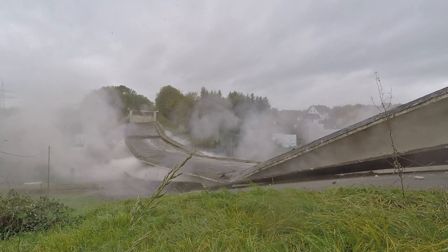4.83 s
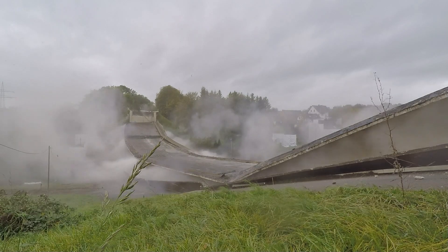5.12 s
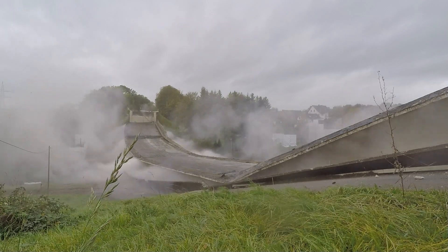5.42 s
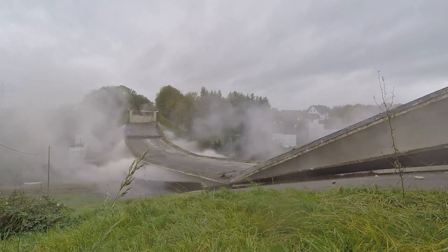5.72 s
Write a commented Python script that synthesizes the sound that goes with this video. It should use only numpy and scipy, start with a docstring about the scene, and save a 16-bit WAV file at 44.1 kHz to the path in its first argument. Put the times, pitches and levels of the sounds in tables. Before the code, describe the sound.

At the start, the tail of an explosion rolls away across an open valley, fading over a low rumble and a light trickle of debris. From about 1 second a concrete bridge crashes down in a run of deep booms, with a loud crack at 1.2 seconds. More heavy landings and hollow block thuds come between 2 and 2.6 seconds. Rubble, gravel and hissing grit pour down, strongest around 2.6 seconds, with clacking stones and a faintly ringing railing. From 2.5 to 4.2 seconds brittle concrete snaps sharply close by, loudest near 4 seconds. Small steel pings are scattered through, and dragged steel squeals briefly around 3.8 to 4 seconds. The rumble swells again, with softer thumps and cracks from 4.4 to 5.5 seconds. The debris thins, but the rumble is still going at the end, near 5.8 seconds. The slopes return faint, dull echoes.

```python
"""A concrete viaduct, its piers blown, collapses span by span across an open valley.
Each landing pushes out a pressure pulse and sets ground and deck rumbling. Concrete bursts and
crushes, brittle pieces snap close by, blocks thud; rubble, gravel, grit and sand pour after them.
Struck steel pings, dragged steel squeals, the railing rings faintly under the gravel.
The blast rolls away between the slopes, which also return a few dull echoes of the impacts."""
import sys
import numpy as np
from scipy import signal
from scipy.fft import rfft, irfft
from scipy.io import wavfile
from scipy.ndimage import uniform_filter1d

SR = 44100
rng = np.random.default_rng(int(sys.argv[2]) if len(sys.argv) > 2 else 0)


def put_to_file(sound):
    """Save the sound as 16-bit audio at rate SR, in the file named by the first command-line argument."""
    columns = np.atleast_2d(sound).T  # one column per channel
    safe = np.clip(columns, -1, 1)
    whole_steps = np.round(safe * 32767)
    wavfile.write(sys.argv[1], SR, whole_steps.astype(np.int16))


N = 254016
TIME = np.arange(N) / SR

# heavy sections landing: start_s, settle_s, level_db, pitch_hz
LANDINGS = [(0.83, 0.029, -12, 100), (1.012, 0.015, -1, 49.7), (1.054, 0.046, -5.5, 58),
            (1.181, 0.044, -5.5, 79.6), (1.268, .01, -5, 70.5), (1.62, 0.01, -2, 79),
            (1.841, 0.042, -8, 39.4), (1.998, 0.039, -5.5, 44), (2.089, 0.023, -0.5, 61),
            (2.335, 0.0076, -6.5, 55), (2.558, 0.0066, -10, 122), (2.998, 0.0087, -11.5, 42),
            (3.103, 0.016, -12.5, 79), (4.457, 0.01, -11, 66), (4.553, .02, -15, 42),
            (4.662, 0.04, -16, 58), (4.923, .025, -12.5, 34), (4.97, .015, -14, 72),
            (5.011, 0.038, -10, 71), (5.295, .02, -17.5, 80.4), (5.389, 0.016, -13, 92),
            (5.491, 0.028, -15, 96)]
# shaking between landings: time_s, ground_db, deck_db
RUMBLE_LEVELS = [(0, -18.5, -19), (0.55, -24.5, -27), (0.9, -22.5, -25), (1.1, -17, -24.5),
                 (1.45, -16.5, -25), (1.76, -21.5, -29), (1.9, -18.5, -30), (2.1, -15, -19.5),
                 (2.26, -21.5, -23), (2.52, -15, -23.5), (2.8, -24.5, -24.5), (3.1, -23, -28),
                 (3.4, -26.5, -24.5), (3.7, -30.5, -32.5), (3.85, -28, -32), (3.98, -26, -35.5),
                 (4.2, -19.5, -25), (4.55, -16.5, -26), (4.8, -22.5, -29), (5.13, -22.5, -23.5),
                 (5.225, -24, -28.5), (5.33, -28, -25.5), (5.48, -24.5, -21.5), (5.62, -34, -25.5),
                 (5.76, -23, -26.5)]
# concrete fractures: start_s, crush_s, crack_db, body_over_crack_db, edge_over_crack_db
FRACTURES = [(1.172, 0.00076, -26.5, 10, -5), (1.216, 0.0055, -22, -5, -1), (1.2192, 0.01, -17.5, -2, -4),
             (1.231, 0.012, -21.5, 8, -5), (1.249, 0.01, -21.5, 6.5, -2), (1.352, 0.028, -35.5, 8, -3.5),
             (1.526, 0.041, -31, 4.5, -19), (1.603, 0.046, -34.5, 4.5, -16), (2.009, 0.036, -38.5, 21, -2),
             (2.047, 0.022, -37.5, 22, -5), (2.084, 0.047, -31, 16.5, -9), (2.15, 0.027, -36.5, 18, -3.5),
             (2.317, 0.026, -26.5, 0, -2), (2.357, 0.0074, -35, 20, -18), (2.539, 0.01, -29.5, 14.5, -9),
             (2.563, 0.0091, -22, -10, -6), (2.62, 0.033, -26, -8, -9), (2.689, 0.031, -26.5, 0, -5),
             (2.839, 0.0097, -22.5, -2.5, -2), (2.926, 0.01, -16, -3.5, -5), (2.944, 0.052, -22, -1, -4),
             (3.233, 0.0031, -31, 9.5, -21), (3.286, 0.0036, -25, -16, -18), (3.344, 0.018, -28, -1, -6.5),
             (3.382, 0.0075, -27.5, 6.5, -2.5), (3.579, 0.0038, -27, 7, 0), (3.655, 0.0048, -23, -6, -1),
             (3.7039, 0.0087, -18, -2, -0.5), (3.7957, 0.012, -27, -3, -2), (3.913, 0.012, -22.5, -9, 0.5),
             (3.9874, 0.0019, -15.5, -4, -1.5), (3.989, 0.012, -19, -8, -6), (4.0276, 0.014, -26, -1.5, -1),
             (4.043, 0.0061, -23.5, -2, -1), (4.109, .006, -26.5, 2, -4.5),
             (4.139, 0.0037, -12.5, -8.5, -4), (4.145, 0.0067, -16, -12, -1), (4.155, 0.02, -28, -1, -7.5),
             (4.265, 0.0045, -29.5, -3, -5.5), (4.291, 0.012, -35, 8.5, -19), (4.39, 0.0051, -31.5, 9, -22),
             (4.419, 0.0034, -33, 8, -12), (4.4592, 0.0015, -29, 2, -3), (4.544, 0.0017, -43, -8, 0.5),
             (4.61, 0.0062, -32, -4, -6), (4.643, 0.0014, -24, -17, -18), (4.663, 0.004, -30, -5, -5),
             (4.691, 0.0023, -35, 6, -22), (4.824, 0.015, -32.5, -10, -5.5), (4.905, 0.018, -33.5, -10, -9),
             (4.948, 0.0014, -28, -12, -26), (4.964, 0.0014, -23.5, -12, -28), (5.199, 0.025, -33, -6, -6),
             (5.695, 0.003, -37.5, 10, -18)]
# brittle pieces parting: time_s, peak_db, pitch_hz
SNAPS = [(1.1733, -24, 1700), (1.222, -1.5, 1500), (2.0485, -16, 600), (2.364, -10, 600),
         (2.4802, -13, 1600), (2.5694, -7, 1500), (2.7164, -23, 1550), (2.9302, -10, 1300),
         (2.954, -6, 2100), (2.9748, -6, 2000), (3.1518, -17, 1900), (3.2381, -17, 1250),
         (3.2874, -16.5, 1150), (3.577, -15, 5500), (3.5784, -26, 1800), (3.6145, -16, 2000),
         (3.6368, -12, 1250), (3.657, -11, 5000), (3.7045, -19, 6500), (3.7058, -6, 1700),
         (3.9876, -0.5, 2300), (3.9892, -21, 1000), (4.028, -14, 1700), (4.139, -9, 965),
         (4.1402, -7, 1600), (4.146, -9, 2100), (4.3007, -21, 860), (4.409, -23, 950),
         (4.4591, -14.5, 1150), (4.5013, -19, 2010), (4.613, -23, 1500), (4.6938, -24, 1240),
         (4.832, -23, 1500), (4.9393, -14.5, 1400), (4.9495, -12, 1050), (5.1179, -21, 1700),
         (5.4018, -17.5, 1500)]
# big blocks hitting the ground: start_s, level_db, pitch_hz
THUDS = [(1.2206, -1, 215), (1.237, -17, 170), (1.554, -12.5, 213), (2.008, -6, 220), (2.026, -10, 260),
         (2.047, -19, 627), (2.105, -20, 333), (2.154, -10, 350), (2.174, -14, 406), (2.206, -9, 265),
         (2.329, -6.5, 227), (2.547, -5, 271), (2.929, -12, 212), (3.236, -25, 1043), (3.287, -21, 1090),
         (3.706, -16.5, 201), (4.142, -17, 244), (4.456, -14, 212)]
# block resonances: pitch_ratio, level_db, t60_s
BLOCK_MODES = [(1, -0.5, 0.051), (1.47, -4.5, 0.047), (2.3, -10.5, 0.037), (3.4, -30, 0.015)]
# debris slide: time_s, gravel_db, grit_db
SLIDE_LEVELS = [(0, -36.5, -41.5), (0.45, -42, -50.5), (1.05, -37.5, -41), (1.15, -39, -43),
                (1.3, -32, -39.5), (1.73, -39, -41), (1.86, -32.5, -35.5), (2.15, -31, -37),
                (2.43, -36, -32.5), (2.53, -28, -29.5), (2.63, -25, -28.5), (2.85, -30, -33.5),
                (3.05, -29.5, -32), (3.22, -33, -38.5), (3.38, -29, -32.5), (3.55, -34.5, -36),
                (4.06, -31, -38.5), (4.3, -38.5, -41.5), (4.75, -36.5, -43), (4.93, -35.5, -41.5),
                (5.76, -39, -47.5)]
# prominence of single stones and surges as the collapse nears: time_s, gain_db
NEARNESS = [(0, -8), (1.2, 2), (2.7, -0.5), (3.2, -0.5), (5.76, 1)]
# steel dragged over concrete: time_s, pitch_hz, level_db
SCRAPE = [(3.76, 1550, -65), (3.8, 1600, -27), (3.835, 1590, -50), (3.885, 1620, -33), (3.93, 1720, -34),
          (3.97, 1780, -31), (4.005, 1800, -38), (4.04, 1750, -43), (4.1, 1750, -60)]
# steel struck: start_s, level_db, pitch_hz, t60_s
PINGS = [(.535, -43, 5000, 0.18), (1.538, -52, 9550, 0.27), (1.81, -41.5, 8340, 0.19),
         (3.104, -31, 6250, 0.05), (3.331, -33.5, 4450, 0.12), (3.6553, -18, 5400, 0.021),
         (3.843, -31, 3950, 0.067), (4.08, -35, 4840, 0.12), (4.562, -36.5, 4410, 0.17),
         (4.564, -45, 8600, 0.11), (5.199, -36, 4250, .09)]
# struck steel resonances: pitch_ratio, level_db
STEEL_MODES = [(.86, -4), (.95, -1.5), (1.02, -1), (1.11, -6)]
# railing resonances: pitch_hz, level_db
RAILING_MODES = [(4170, 6), (8300, -15), (8750, -13), (10450, -30)]
# railing under falling gravel: time_s, level_db
RAILING_LEVELS = [(0, -80), (2.3, -52), (2.8, -44.5), (4.0, -59), (4.6, -59), (5.76, -61)]
# falling sand: time_s, level_db
SAND_LEVELS = [(0.0, -65), (0.3, -82), (1.12, -65), (1.39, -59), (1.7, -59), (2.5, -48.5), (2.81, -56),
               (3.13, -58), (3.9, -59), (4.28, -66), (5.76, -79)]
# reflections off deck and slopes: delay_s, gain_db
ECHOES = [(0.032, -27), (0.082, -31), (.147, -33), (0.263, -49)]

# source spectra: frequency_hz, relative_db
GROUND_SPECTRUM = [(12, -15), (20, -6), (26, -2.1), (33, -0.5), (44, -2), (56, -1.5), (75, -22)]
DECK_SPECTRUM = [(45, -12.5), (62, 1), (80, -2.5), (100, -1), (135, -6), (180, -9.5), (250, -18.5),
                 (360, -37.5)]
BODY_SPECTRUM = [(120, 4.5), (220, 7.5), (450, 1), (800, -1), (1300, -12)]
CRACK_SPECTRUM = [(550, -9), (950, -7), (1750, -3), (2800, -13.5), (4000, -31.5)]
EDGE_SPECTRUM = [(2200, 5.5), (3400, 12.5), (5300, 8), (6500, -2), (8500, -12)]
SPRAY_SPECTRUM = [(5000, 3.5), (7000, 2.5), (9500, -3), (12000, -8.5), (15500, -11)]
RUBBLE_SPECTRUM = [(170, -30), (250, 2.5), (400, -3), (650, -5), (950, -10), (1400, -40)]
GRAVEL_SPECTRUM = [(600, -10), (850, -4.5), (1150, 6.5), (1700, 5), (2600, 1.5), (3300, -3.5), (4400, -2),
                   (5600, -11), (7000, -21), (9500, -51)]
GRIT_SPECTRUM = [(2700, -6.5), (3500, 9), (4500, 10.5), (5700, 7), (7000, 2), (8500, -3.5), (10500, -9),
                 (12000, -19.5), (15500, -20.5)]
SAND_SPECTRUM = [(9000, -5), (11500, 0), (15500, -8)]
BLAST_SPECTRUM = [(200, -0.5), (330, -1), (500, 5.5), (750, 0), (1200, -4.5), (2000, -10), (3000, -13.5),
                  (4300, -15.5), (6000, -25), (9000, -38.5)]


def landings():
    """Each landing section pushes out one swing of pressure."""
    return sum(from_db(db - 2.5) * swing(start_s, hz) for start_s, _, db, hz in LANDINGS)


def shudder():
    """Power that landings leave in ground and deck; the lower the pitch, the more goes to the ground."""
    rise_s, t60_s = 0.047, 0.12
    tilt_db_per_octave, pivot_hz = 4.5, 62.4
    ground_power, deck_power = np.zeros(N), np.zeros(N)
    for start_s, settle_s, db, hz in LANDINGS:
        rise = np.clip(1 + (TIME - start_s) / rise_s, 0, 1)
        fade_db = -60 * np.clip((TIME - start_s - settle_s) / t60_s, 0, 2)
        tilt_db = tilt_db_per_octave * np.log2(hz / pivot_hz)
        power = (rise * from_db(db + fade_db)) ** 2
        ground_power += power * from_db(-10.5 - tilt_db) ** 2
        deck_power += power * from_db(-11 + tilt_db) ** 2
    return ground_power, deck_power


def rumble():
    """Ground and hollow deck shake under the falling mass: uneven buffets, harder at each landing."""
    ground_db, deck_db = curves(RUMBLE_LEVELS)
    ground_power, deck_power = shudder()
    ground_bed = from_db(ground_db - 1.05 + 3.3 * drift(rate_hz=16))
    deck_bed = from_db(deck_db + 2.1 * drift(rate_hz=16))
    shake = levelled(coloured(noise(), GROUND_SPECTRUM), span_s=0.029)
    boom = levelled(deck_boom(), span_s=0.043)
    return np.sqrt(ground_bed ** 2 + ground_power) * shake + np.sqrt(deck_bed ** 2 + deck_power) * boom


def deck_boom(split_hz=115, dulling_db_per_s=2):
    """The boom dulls as more of the deck lies on the ground."""
    boom = coloured(noise(), DECK_SPECTRUM)
    low = lowpass(boom, split_hz, order=1)
    return low + (boom - low) * from_db(3 - dulling_db_per_s * TIME)


def fractures():
    """Concrete breaks: massive pieces have more body, near ones more edge; fine splinters spray after."""
    _, _, crack_db, body_over_db, edge_over_db = np.transpose(FRACTURES)
    body_db = crack_db + body_over_db - 0.5
    edge_db = crack_db + edge_over_db - 0.2
    spray_db = 0.5 * crack_db + 2.6 * edge_over_db - 20
    body = bursts(body_db, BODY_SPECTRUM, snap=0.19, t60_s=0.0081, tail_db=-11.5, tail_t60_s=0.66)
    crack = bursts(crack_db - 1, CRACK_SPECTRUM, snap=1.8, t60_s=0.018, tail_db=-11, tail_t60_s=0.09)
    edge = bursts(edge_db, EDGE_SPECTRUM, snap=0.14, t60_s=0.0036, tail_db=-12, tail_t60_s=0.19)
    spray = bursts(spray_db, SPRAY_SPECTRUM, snap=0.91, t60_s=0.026, tail_db=-12, tail_t60_s=0.36)
    return body + crack + edge + spray


def bursts(levels_db, spectrum, snap, t60_s, tail_db, tail_t60_s):
    """One band of the fractures: a snap, tearing while the piece is crushed, a scattered tail."""
    power = np.zeros(N)
    for (start_s, crush_s, *_), db in zip(FRACTURES, levels_db):
        start = int(start_s * SR)
        age_s = TIME[:min(N - start, SR // 2)]
        after_s = np.maximum(age_s - crush_s, 0)
        onset = snap * np.exp(-age_s / 0.0015)
        crush = from_db(-60 * after_s / t60_s) ** 2
        tail = from_db(tail_db - 60 * after_s / tail_t60_s) ** 2
        power[start:start + len(age_s)] += from_db(db) ** 2 * (onset + crush + tail)
    tearing = levelled(coloured(stones(per_s=1500, spread_db=0, wash=0.25), spectrum), span_s=0.0022)
    top_hz = spectrum[-1][0]  # keeps the onset within the band
    return lowpass(np.sqrt(power) * tearing, top_hz, order=4)


def snaps():
    """A brittle piece parts at once: one very short, harsh pressure swing, no ring."""
    return sum(from_db(db) * swing(time_s, hz) for time_s, db, hz in SNAPS)


def thuds():
    """Blocks land with a short hollow knock; mode pitch and strength vary per block."""
    out = np.zeros(N)
    for start_s, db, hz in THUDS:
        start = int(start_s * SR)
        age_s = np.maximum(TIME[start:start + SR // 8] - start_s, 0)
        rise = 1 - np.exp(-2 * hz * age_s)
        for ratio, mode_db, t60_s in BLOCK_MODES:
            detune, scatter_db = rng.standard_normal(2)
            ring = np.sin(2 * np.pi * hz * ratio * (1 + 0.04 * detune) * age_s)
            decay = from_db(db + mode_db + scatter_db - 60 * age_s / t60_s)
            out[start:start + len(age_s)] += rise * decay * ring
    return out


def debris():
    """Rubble, gravel and grit slide in a surging rush; single lumps knock, clack and chink on top."""
    landed_s, sink_db_per_s, settle_db_per_s = 4.85, 2.5, 5
    gravel_db, grit_db = curves(SLIDE_LEVELS)
    near_db, = curves(NEARNESS)
    # big blocks fall first; once most have landed, surges and single knocks die down
    rubble_db = gravel_db + 5 - sink_db_per_s * np.minimum(TIME, landed_s)
    single_db = near_db - settle_db_per_s * np.maximum(TIME - landed_s, 0)
    surge = drift(rate_hz=40) * from_db(single_db)
    _, deck_power = shudder()
    thrown = from_db(-22.5) * np.sqrt(deck_power)  # blocks thrown by landings

    blocks = stones(per_s=450, spread_db=3, wash=0.95)
    chips = stones(per_s=900, spread_db=3, wash=2.2)
    rubble = levelled(coloured(blocks, RUBBLE_SPECTRUM), span_s=0.088)
    rubble *= np.hypot(from_db(rubble_db), thrown) * from_db(1.14 * surge)
    gravel = levelled(coloured(chips + 0.52 * blocks, GRAVEL_SPECTRUM), span_s=0.048)
    gravel *= from_db(gravel_db - 1.85 + 0.99 * surge)
    grit = levelled(coloured(chips, GRIT_SPECTRUM), span_s=0.073)
    grit *= from_db(grit_db - 2 + 2.2 * surge)

    lumps = knocks(per_s=85, low_hz=750, high_hz=3200, spread_db=10, t60_cycles=11, rattle=0.16)
    lumps *= from_db(gravel_db + single_db - 7)
    clacks = coloured(stones(per_s=45, spread_db=2.2, wash=0), CRACK_SPECTRUM)
    clacks *= from_db(gravel_db + single_db - 8)
    chinks = knocks(per_s=55, low_hz=2800, high_hz=6500, spread_db=9, t60_cycles=55, rattle=0.2)
    chinks *= from_db(grit_db + single_db - 10)
    return rubble + gravel + grit + lumps + clacks + chinks


def stones(per_s, spread_db, wash):
    """Random stone impacts, few large and many small, over a wash of countless far ones."""
    sizes = from_db(spread_db * np.minimum(rng.exponential(1, N), 4)) * rng.choice([-1, 1], N)
    impacts = sizes * (rng.random(N) < per_s / SR)
    return impacts / impacts.std() + wash * noise()


def knocks(per_s, low_hz, high_hz, spread_db, t60_cycles, rattle):
    """Pieces knock singly, each ringing at its own pitch and rattling as it settles."""
    age_s = TIME[:SR // 40]
    length = len(age_s)
    out = np.zeros(N + length)
    for when, size, pitch in rng.random((int(per_s * N / SR), 3)):
        hz = low_hz * (high_hz / low_hz) ** pitch
        contacts = rattle * rng.standard_normal(length) * np.exp(-age_s / 0.014)
        contacts[0] = 1  # first hit
        ring = np.sin(2 * np.pi * hz * age_s) * from_db(-60 * hz * age_s / t60_cycles)
        start = int(when * N)
        out[start:start + length] += from_db(spread_db * size ** 2) * np.convolve(contacts, ring)[:length]
    return out[:N] / out.std()


def steel_scrape():
    """Steel dragged over concrete sticks, slips and squeals."""
    pitch_hz, level_db = curves(SCRAPE)
    slip_db = 3 * drift(rate_hz=150)
    squeal = levelled(rough_tone(pitch_hz, width_hz=480), span_s=0.012)
    return from_db(level_db + slip_db) * squeal * (TIME > SCRAPE[0][0])


def steel_pings():
    """Struck bars ring briefly in a cluster of close modes."""
    out = np.zeros(N)
    for start_s, db, hz, t60_s in PINGS:
        age_s = np.maximum(TIME - start_s, 0)
        rise = np.minimum(age_s * hz, 1)  # one cycle
        ring = sum(from_db(mode_db) * rough_tone(hz * ratio, width_hz=450)
                   for ratio, mode_db in STEEL_MODES)
        out += rise * from_db(db - 60 * np.minimum(age_s / t60_s, 2)) * ring
    return out


def railing():
    """Falling gravel keeps the railing ringing faintly."""
    level_db, = curves(RAILING_LEVELS)
    return from_db(level_db) * sum(from_db(db) * rough_tone(hz, width_hz=120) for hz, db in RAILING_MODES)


def sand():
    """Fine sand falls in small spurts with a high hiss."""
    sand_db, = curves(SAND_LEVELS)
    spurts_db = 1.3 * drift(rate_hz=14) + 1.2 * drift(rate_hz=60)
    grains = stones(per_s=1400, spread_db=-1, wash=1.1)
    return from_db(sand_db - 1.5 + spurts_db) * coloured(grains, SAND_SPECTRUM)


def splinters(t60_s=0.031):
    """Flakes split off the sliding concrete in tiny dry spits; level follows the sand."""
    sand_db, = curves(SAND_LEVELS)
    splits = stones(per_s=34, spread_db=2.2, wash=0)
    envelope = signal.lfilter([1], [1, -from_db(-60 / (t60_s * SR))], np.abs(splits) + 1e-18)
    return from_db(sand_db + 2) * coloured(envelope * noise(), SPRAY_SPECTRUM)


def blast_echo(t60_s=2.84):
    """The bang of the charges rolls between the slopes and dies away."""
    level_db = -26 - 60 * TIME / t60_s + 1.1 * drift(rate_hz=34.6)
    return from_db(level_db) * coloured(noise(), BLAST_SPECTRUM)


def valley_echoes(x):
    """A few separate echoes, dulled by grass and trees."""
    dull = lowpass(x, cutoff_hz=2500, order=2)
    return sum(from_db(db) * np.interp(TIME - delay_s, TIME, dull, left=0) for delay_s, db in ECHOES)


def swing(centre_s, hz):
    """One pressure swing, down then up; peak 1."""
    phase = np.clip(2 * np.pi * hz * (TIME - centre_s), -10, 10)
    return phase * np.exp((1 - phase ** 2) / 2)


def rough_tone(hz, width_hz):
    """Resonance driven by irregular contact; rms 1."""
    phase = 2 * np.pi * np.cumsum(hz * np.ones(N) / SR)
    return drift(width_hz) * np.sin(phase) + drift(width_hz) * np.cos(phase)


def coloured(x, spectrum):
    """Minimum-phase filter to a spectrum, 30 dB/octave down past its ends; rms 1."""
    hz, db = np.transpose(spectrum)
    bin_oct = np.log2(np.maximum(np.arange(N // 2 + 1) * SR / N, 1))
    knot_oct = np.log2(hz)
    outside_oct = np.abs(bin_oct - np.clip(bin_oct, knot_oct[0], knot_oct[-1]))
    gain_db = np.maximum(np.interp(bin_oct, knot_oct, db) - 30 * outside_oct, -90)
    cepstrum = irfft(np.log(from_db(gain_db)), N)
    cepstrum[1:N // 2] *= 2  # fold to causal
    cepstrum[N // 2 + 1:] = 0
    y = irfft(rfft(x) * np.exp(rfft(cepstrum)), N)
    return y / y.std()


def levelled(x, span_s):
    """Rms held near 1 over span_s; faster detail stays."""
    size = int(span_s * SR)
    power = uniform_filter1d(uniform_filter1d(x * x, size), size)
    return x / np.sqrt(np.maximum(power, 1e-20))


def lowpass(x, cutoff_hz, order):
    """Causal, maximally flat low-pass."""
    return signal.sosfilt(signal.butter(order, cutoff_hz, fs=SR, output="sos"), x + 1e-18)


def drift(rate_hz):
    """Random wander through rate_hz knots a second; rms 1."""
    knots = rng.standard_normal(4096)
    return np.interp(TIME * rate_hz, np.arange(len(knots)), knots) * np.sqrt(3 / 2)


def noise():
    """White noise."""
    return rng.standard_normal(N)


def curves(rows):
    """Value columns of a time table, interpolated per sample."""
    time_s, *columns = np.transpose(rows)
    return [np.interp(TIME, time_s, column) for column in columns]


def from_db(db):
    """Decibels to gain."""
    return 10 ** (np.asarray(db) / 20)


def scene():
    """The collapse from one spot on the slope, mono; only the sharp sounds feed the echoes."""
    sharp = fractures() + snaps() + thuds() + steel_scrape() + steel_pings() + railing()
    rolling = blast_echo() + rumble() + landings()
    pouring = sand() + splinters() + debris()
    return (rolling + sharp + valley_echoes(sharp) + pouring)[None]


def record(dry):
    """Soft-clip the peaks, fade both ends, cut the top."""
    ceiling, fade_s, cutoff_hz = 0.95, 0.004, 15300
    rounded = dry / (1 + (dry / ceiling) ** 6) ** (1 / 6)
    from_end_s = np.minimum(TIME, TIME[::-1])
    fade = np.sin(np.pi / 2 * np.minimum(from_end_s / fade_s, 1)) ** 2
    return signal.sosfilt(signal.ellip(10, 0.1, 80, cutoff_hz, fs=SR, output="sos"), rounded * fade)


dry = scene()
out = record(dry)
put_to_file(out)
```